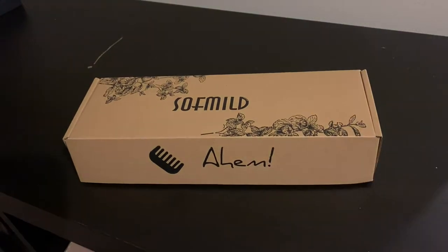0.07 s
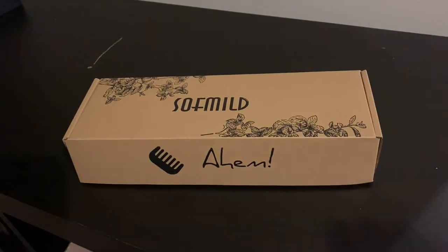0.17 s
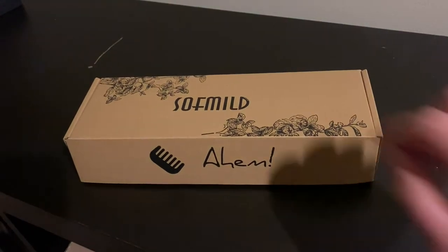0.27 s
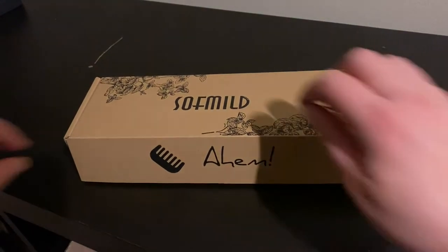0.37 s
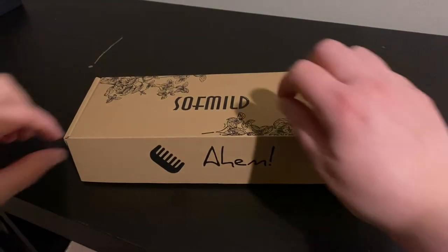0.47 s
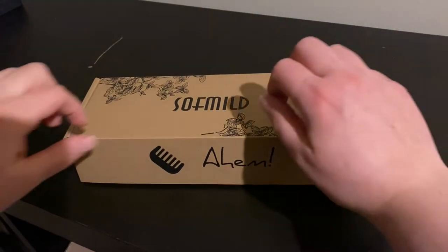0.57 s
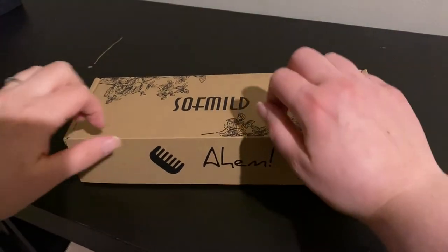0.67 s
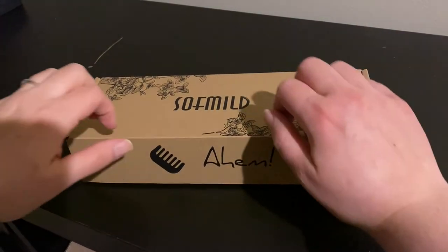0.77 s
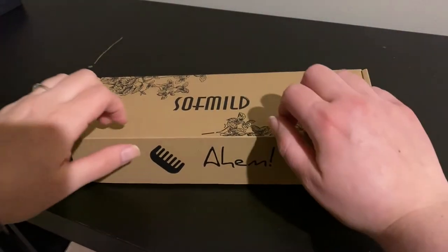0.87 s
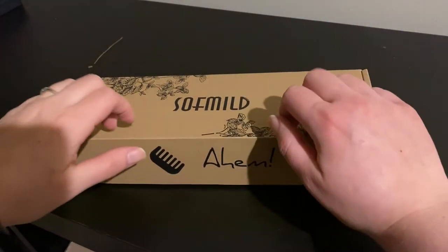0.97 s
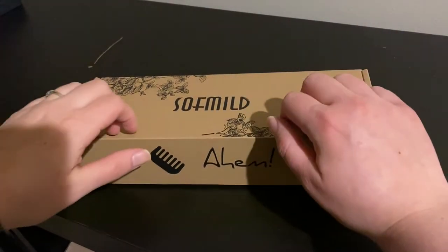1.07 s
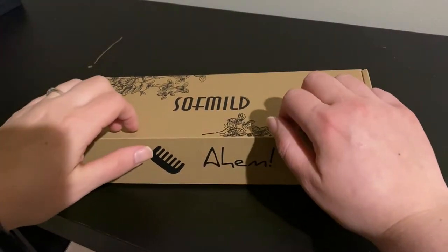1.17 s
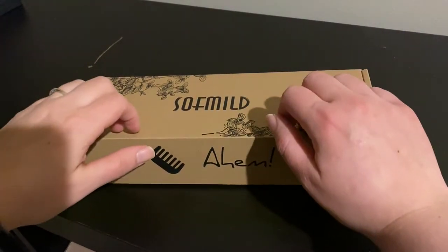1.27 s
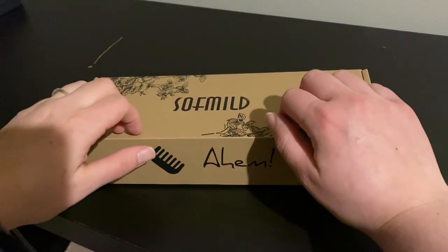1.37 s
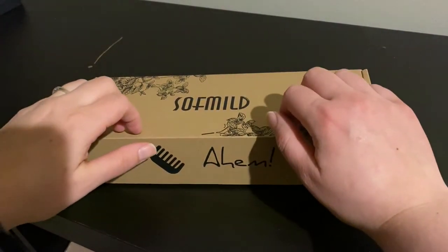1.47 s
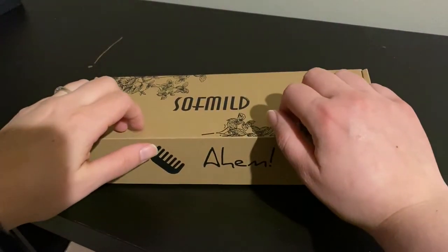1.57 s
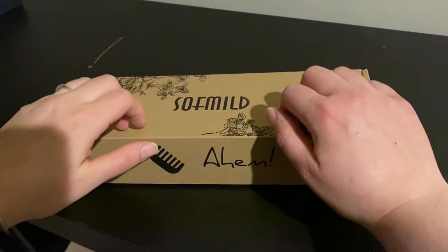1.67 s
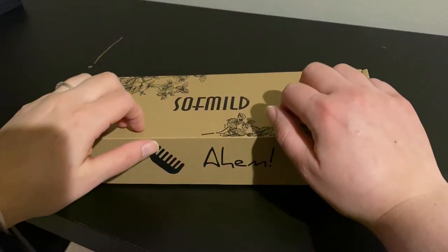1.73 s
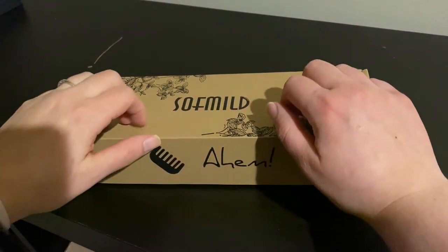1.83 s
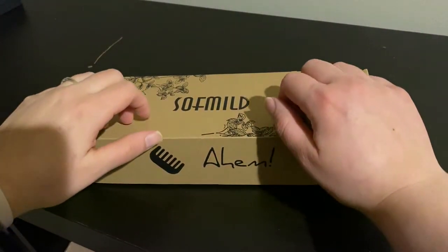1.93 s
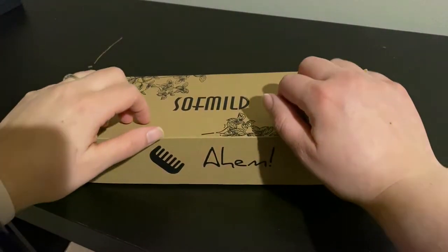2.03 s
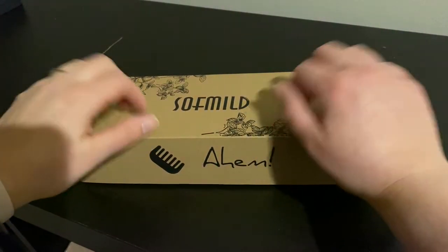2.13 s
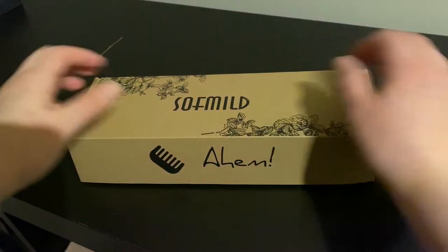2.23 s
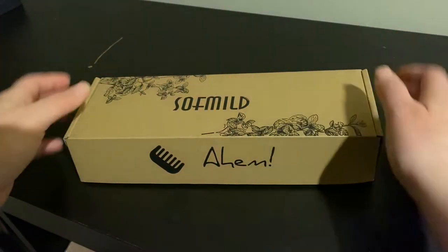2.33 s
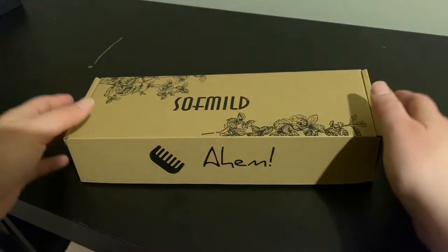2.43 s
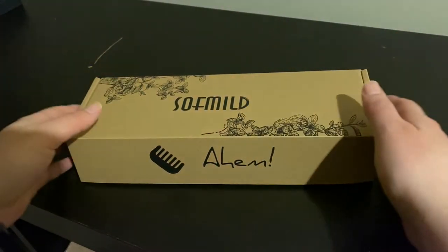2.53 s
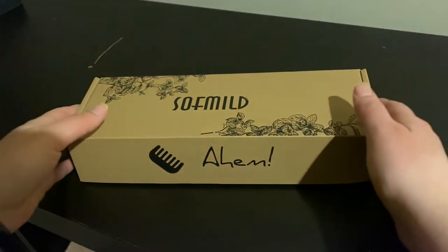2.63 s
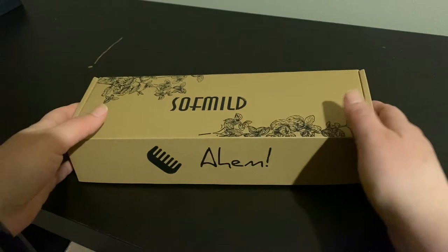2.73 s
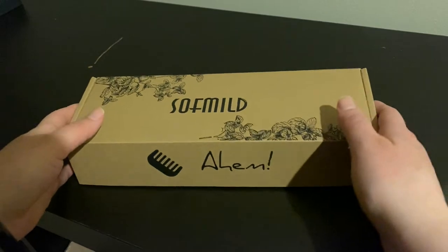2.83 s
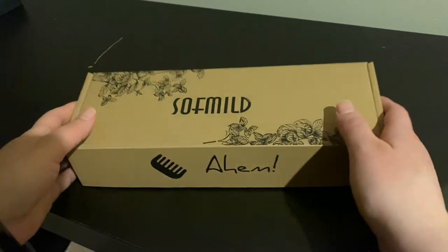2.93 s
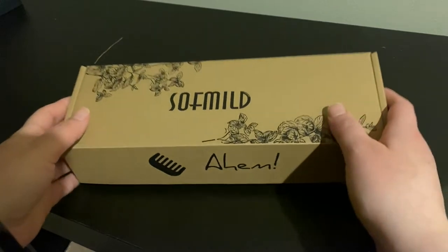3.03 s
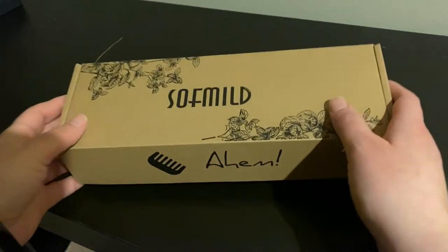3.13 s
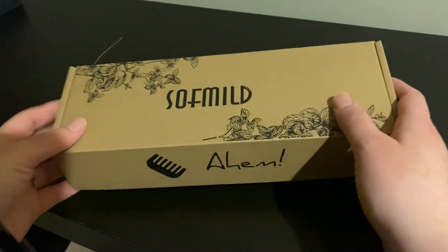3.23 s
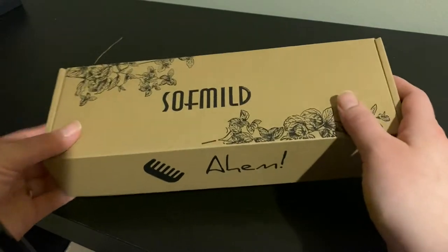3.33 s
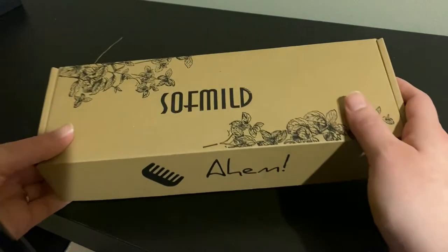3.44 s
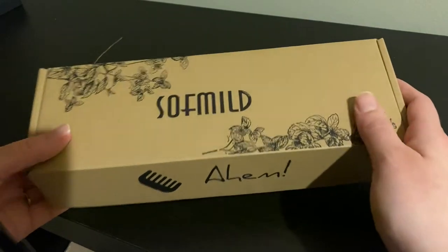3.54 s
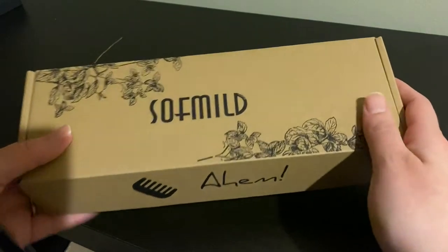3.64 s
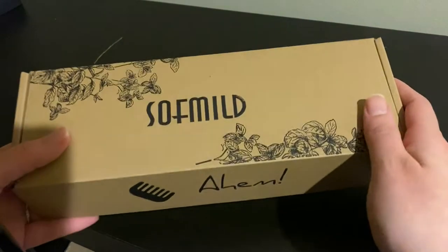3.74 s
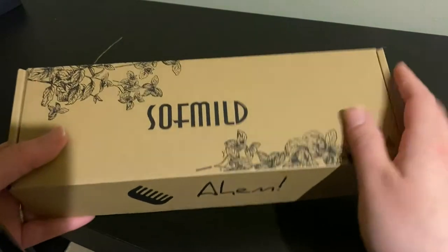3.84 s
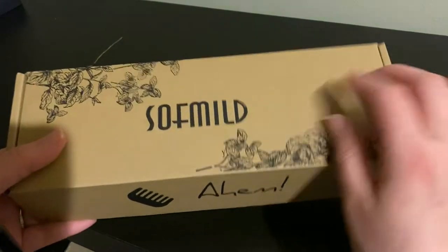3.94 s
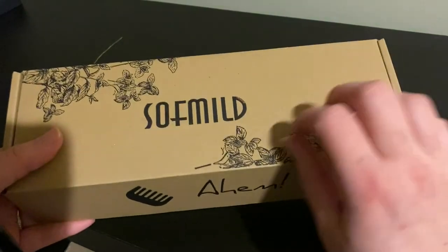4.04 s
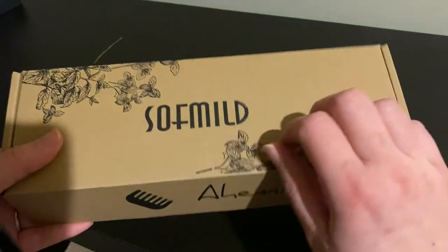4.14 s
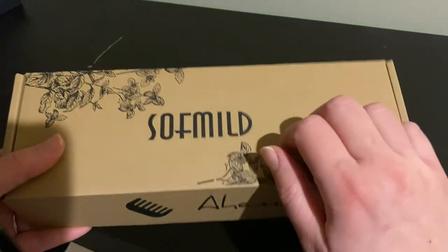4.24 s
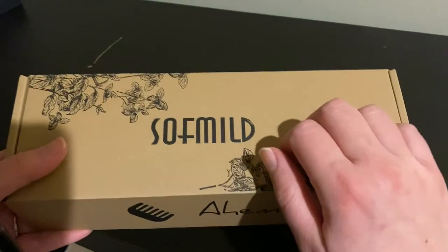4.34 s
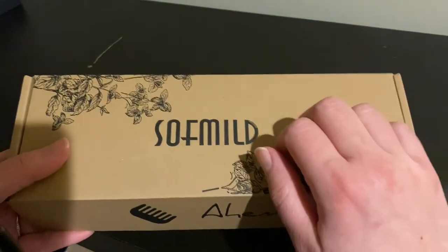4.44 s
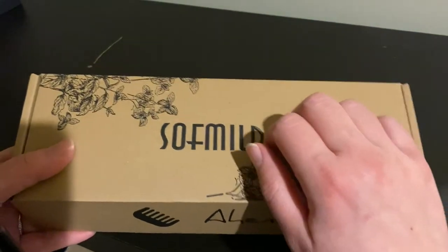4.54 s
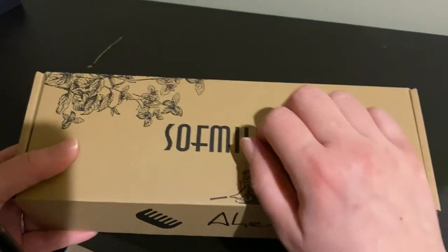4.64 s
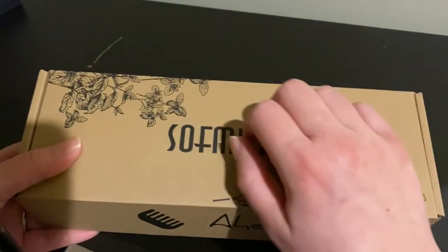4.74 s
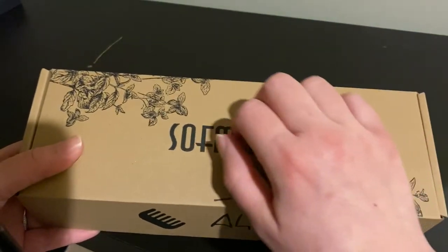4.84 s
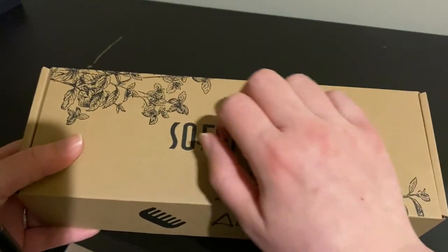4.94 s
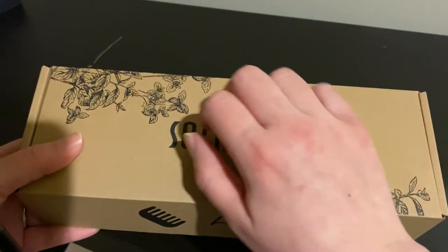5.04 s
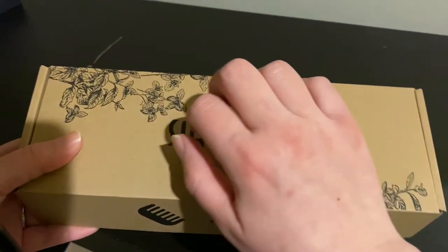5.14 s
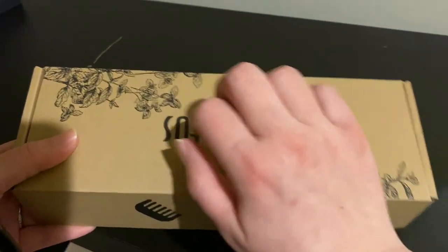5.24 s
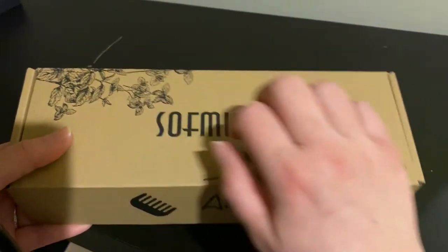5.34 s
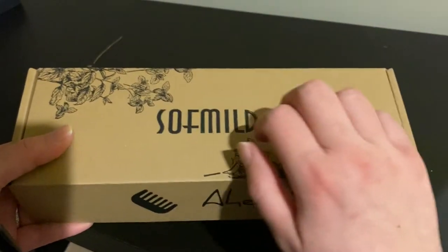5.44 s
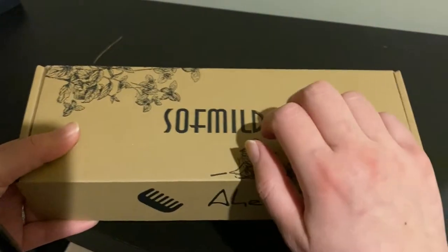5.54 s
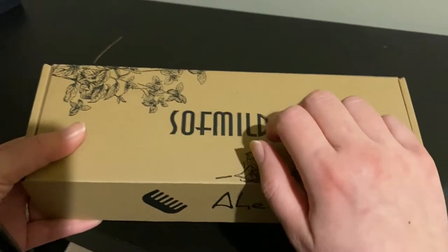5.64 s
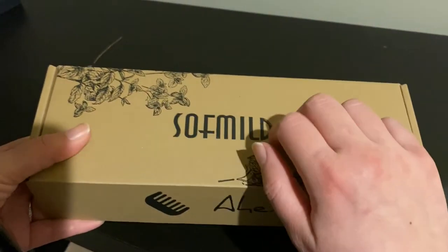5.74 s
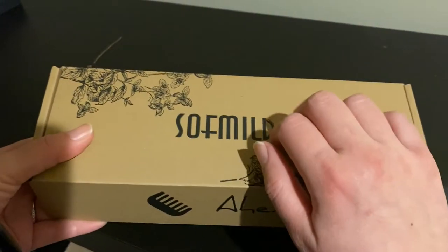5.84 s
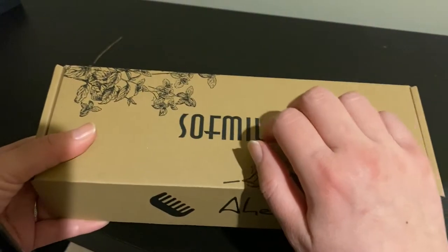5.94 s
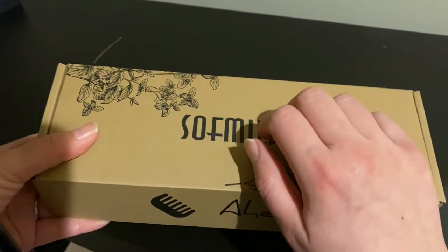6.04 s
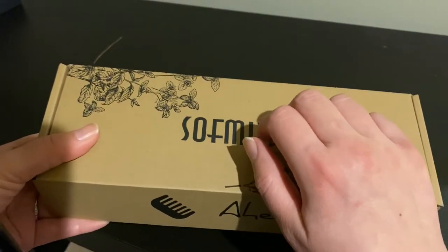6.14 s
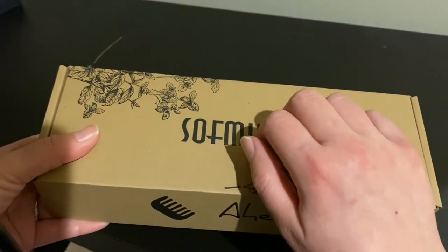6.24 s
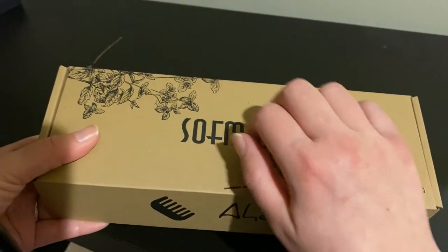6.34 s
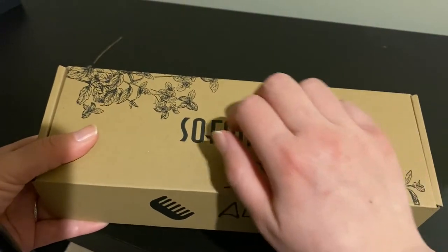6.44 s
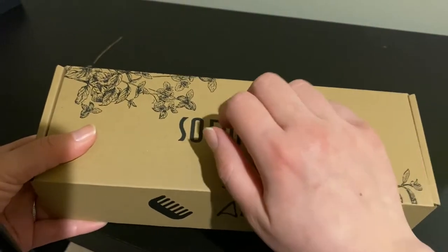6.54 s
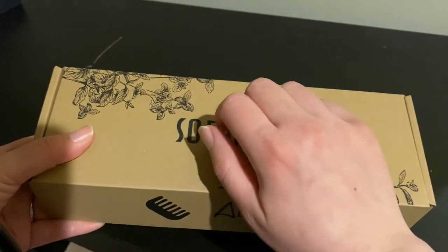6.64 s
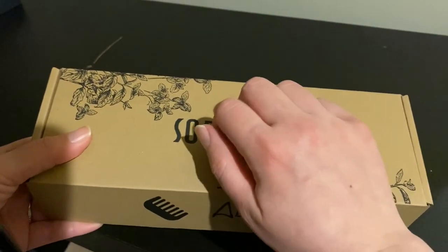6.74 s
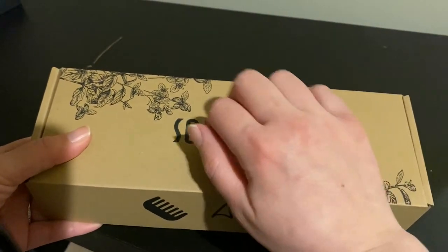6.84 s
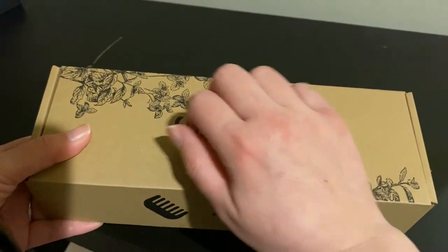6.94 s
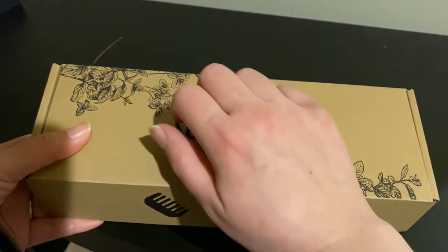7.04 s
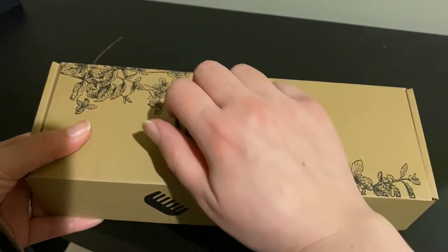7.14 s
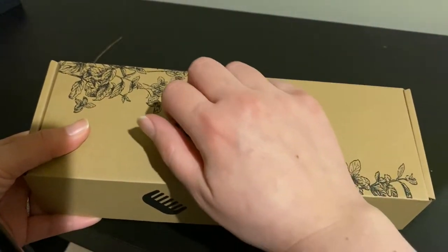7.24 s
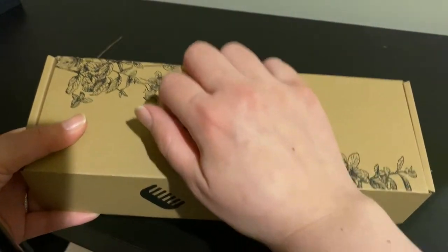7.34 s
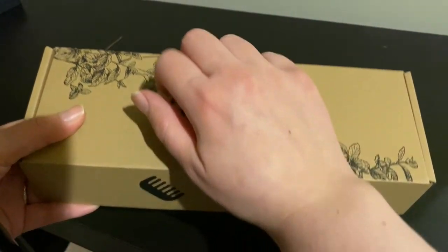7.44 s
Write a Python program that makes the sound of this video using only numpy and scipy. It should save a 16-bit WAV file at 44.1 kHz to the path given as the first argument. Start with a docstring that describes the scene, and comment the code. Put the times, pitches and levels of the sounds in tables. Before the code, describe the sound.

Very close to a stereo microphone in a quiet room, fingernails of two hands drum rapidly on a small corrugated cardboard box. The drumming stops, hands shift and lift the box with soft papery rubbing and skin hiss, then nails tap and scratch the lid in looser bursts with short pauses. Low wavering rumble and faint hiss sit underneath.

```python
"""Fingernails drum on a small corrugated cardboard box close to a two-port microphone in a quiet room.
Hands grip and lift the box, skin hissing on the paper; then one hand taps and drags on the lid.
Nail taps are clicks with dying panel sines, drags are random slips that ring the panels, rasp and
hiss are coloured noise. Short room echoes and a low wavering rumble with faint hiss lie around them."""
import sys
import numpy as np
from scipy import signal
from scipy.fft import rfft, irfft
from scipy.io import wavfile
from scipy.ndimage import uniform_filter1d

SR = 44100
rng = np.random.default_rng(int(sys.argv[2]) if len(sys.argv) > 2 else 0)


def digitize_waveform(pressure):
    """Quantize a signal to 16-bit integers and store it at the path in sys.argv[1].

    Rows of a 2-D input are taken as channels; values are limited to [-1, 1].
    """
    field = np.atleast_2d(pressure).T
    bounded = np.clip(field, -1, 1)
    quanta = np.round(bounded * 32767).astype(np.int16)
    wavfile.write(sys.argv[1], SR, quanta)


N = 330750  # samples, 7.5 s
LIFTED_S = 2.3  # before it two hands drum on the resting box, after it one hand on the held box
TREBLE_PAN_DB = -3.5  # left against right for fine noise, the same wherever the hand is
RING_N = 4096  # samples computed of each click and ring


def amp(db):
    """Turns decibels into an amplitude factor."""
    return 10 ** (np.asarray(db) / 20)


def evened(x):
    """Scales a signal to an RMS of one."""
    return x / np.sqrt(np.mean(x ** 2) + 1e-20)


def read(points, hz):
    """Reads a curve between its points along a logarithmic frequency axis."""
    point_hz, value = np.transpose(points)
    return np.interp(np.log(hz + 1), np.log(point_hz + 1), value)


def colour(x, points):
    """Filters by a spectrum in dB."""
    hz = np.fft.rfftfreq(x.shape[-1], 1 / SR)
    return irfft(rfft(x) * amp(read(points, hz)), x.shape[-1])


def pair(a, b, same):
    """Two channels from two unrelated signals, alike by the share same(Hz)."""
    likeness = np.clip(read(same, np.fft.rfftfreq(N, 1 / SR)), -1, 1)
    right = likeness * rfft(a) + np.sqrt(1 - likeness ** 2) * rfft(b)
    return np.array([a, irfft(right, N)])


def sides(pan_db):
    """Left and right gains that differ by pan_db, positive to the left."""
    return amp(np.multiply.outer([.5, -.5], pan_db))


def smooth_noise(size):
    """Slow random curve: noise averaged twice over size samples, RMS one."""
    once = uniform_filter1d(rng.standard_normal(N), size)
    return evened(uniform_filter1d(once, size))


# spectrum of the quiet room at the microphone: hz, level_db (per Hz)
AIR = [(42, -11.5), (57, 2), (75, 1.5), (100, -11), (125, -2), (155, -9), (185, -6), (350, -13.5),
       (450, -20), (700, -31), (1300, -45), (7000, -53), (14000, -58.5), (15000, -76.5)]
# how alike the room tone is at the two ports: hz, likeness (1 = identical)
AIR_SAME = [(60, 1), (240, 0.74), (930, -0.03), (3630, 0.58), (14300, 0.95)]
# slow level of the rumble, before swells and knocks: time_s, level_db
RUMBLE = [(0, -57), (.7, -61), (1.1, -55), (2.3, -58), (3.5, -56.5), (4.1, -56), (4.6, -57), (5.5, -54),
          (6.6, -53), (7.5, -57)]
# brief swells of the rumble: peak_s, rise_db
SWELLS = [(2.23, 5), (2.44, 7.5), (3.75, 6.5), (4.07, 2.5), (4.26, 3), (4.95, 7), (6.77, 1)]


def room_tone(box):
    """A low rumble wavers and swells as the table passes the knocks on, under a steady faint hiss."""
    swell_s, waver_s, waver_db = 0.031, 0.05, 1.5
    shake_s, shake_db = 0.017, 34  # how the rumble follows the box's own level
    air_db = -63.5  # room tone above the rumble
    noise = pair(*colour(rng.standard_normal((2, N)), AIR), AIR_SAME)
    low = colour(noise, [(160, -2), (260, -36)])
    t = np.arange(N) / SR
    level_db = np.interp(t, *np.transpose(RUMBLE)) + waver_db * smooth_noise(int(waver_s * SR))
    for peak_s, rise_db in SWELLS:
        level_db += rise_db * np.exp(-((t - peak_s) / swell_s) ** 2)
    box_power = abs(uniform_filter1d((box ** 2).mean(0), int(shake_s * SR)))
    shake = np.sqrt(1 + amp(shake_db) ** 2 * box_power)
    return amp(level_db) * shake * evened(low) + amp(air_db) * evened(noise - low)


# panels of the box: pitch_hz, level_db, t60_s (before a finger damps them)
BOX = [(214.6, 5.5, 0.042), (264, 3, 0.058), (340.6, -2, 0.036), (408, -1, 0.028), (460.3, -4, 0.06),
       (516, -5, 0.043), (569.4, -3, 0.054), (637, -2.5, 0.044), (705, -4, 0.019), (842, 1, 0.029),
       (947, 1, 0.042), (1030, -1, 0.04), (1119, -3, 0.055), (1233, 2.5, 0.022), (1402, -4, 0.034),
       (1552, -5, 0.031), (1721, -3, 0.035), (1889, -1, 0.019), (2159, -3.5, 0.019), (2424, -13.5, 0.027),
       (2698, -6, 0.026)]
PANEL_HZ = np.transpose(BOX)[0]
PANEL_SIGN = (-1) ** (np.arange(len(PANEL_HZ)) // 2)  # used by taps: modes push against their neighbours


def rings(t):
    """One dying sine for each panel mode."""
    hz, db, t60 = np.transpose(BOX)[:, :, None]
    return amp(db - 60 * t / t60) * np.sin(2 * np.pi * hz * t)


def slips(per_s, spread_db):
    """Fibres that catch and let go: clicks of random sign, a few large."""
    size = amp(spread_db * np.minimum(rng.exponential(1, (2, N)), 5))
    let_go = rng.random((2, N)) < per_s / SR
    return size * let_go * rng.choice([-1, 1], (2, N))


def drag(centre_hz, lift_db, low_db, high_db, per_s):
    """Coarse slips ring the panels, most those near centre_hz."""
    share_db = lift_db * np.exp(-(np.log(PANEL_HZ / centre_hz) / 0.6) ** 2)
    share_db += low_db * (PANEL_HZ < 320) + high_db * (PANEL_HZ > 800)
    signs = (-1) ** np.arange(len(PANEL_HZ))
    panels = amp(share_db) * signs @ rings(np.arange(RING_N) / SR)
    return evened(signal.oaconvolve(slips(per_s, 3.0), panels[None])[:, :N])


def mottled(x, depth_db, size):
    """The colour shifts as the contact moves: random patches some hundred Hz wide, size frames long."""
    z = signal.stft(x, nperseg=256, noverlap=192)[2]
    patches = uniform_filter1d(rng.standard_normal(z.shape[1:]), size=2, axis=0)
    patches = evened(uniform_filter1d(patches, size=size, axis=1))
    return evened(signal.istft(z * amp(depth_db * patches), nperseg=256, noverlap=192)[1][:, :N])


# hands and sleeves brushing the box: loudest_s, rise_s, fall_s,
# drag_db (on the panels), grit_db, hiss_db (skin and cloth)
RUB = [(.03, .08, 0.076, -70, -76, -80.5), (0.298, 0.33, 0.79, -71, -73, -78.5),
       (2.44, 0.16, 0.45, -77, -83, -74.5), (2.535, .03, 0.072, -61, -78, -77),
       (2.639, 0.077, 0.076, -45.5, -51.5, -62), (2.801, 0.14, 0.092, -53.5, -70, -74),
       (2.88, 0.1, 0.2, -68, -64, -63.5), (3.1, 0.17, 0.089, -61.5, -69, -75.5),
       (3.212, .05, 0.059, -61, -60, -52.5), (3.326, 0.063, 0.06, -57.5, -57, -58),
       (3.502, .13, 0.063, -52.5, -49, -47.5), (3.599, 0.13, 0.068, -50.5, -56.5, -48),
       (3.772, 0.095, 0.069, -37, -47, -51.5), (3.898, 0.069, 0.11, -62, -63, -51.5),
       (4.78, .06, 0.12, -69, -86, -92)]


def brushes():
    """Hands swell and fade on the box: levels of panel drag, grit and hiss over time."""
    edge_db, flatness = -25, 1.92  # level at start and end; higher flatness stays longer near the loudest
    t, level = np.arange(N) / SR, np.zeros((3, N))
    for loudest_s, rise_s, fall_s, *levels_db in RUB:
        away = np.where(t < loudest_s, (loudest_s - t) / rise_s, (t - loudest_s) / fall_s)
        near = away < 2
        level[:, near] += amp(np.add.outer(levels_db, edge_db * away[near] ** flatness))
    return level


# nails scratching on the lid, some of them close to a tap: start_s, length_s,
# rise_share (of the length), drag_db (on the panels), grit_db
SCRATCHES = [(1.077, 0.041, 0.32, -51.5, -61), (1.175, 0.048, 0.46, -56, -67),
             (1.304, 0.025, .47, -42, -63), (1.417, 0.036, 0.49, -44, -60), (1.59, 0.064, 0.77, -52, -58.5),
             (1.908, 0.1, 0.42, -55, -65), (2.013, 0.086, 0.51, -45.5, -64),
             (4.114, 0.073, 0.41, -51, -61.5), (4.17, 0.095, 0.17, -43.5, -61.5),
             (4.25, 0.061, .1, -46, -66.5), (4.322, 0.059, .85, -43, -63.5),
             (4.385, 0.13, 0.26, -43, -58.5), (4.521, 0.11, 0.19, -36.5, -56.5),
             (4.586, 0.042, 0.66, -37.5, -52), (4.624, 0.084, 0.12, -39.5, -48.5),
             (4.697, 0.057, 0.24, -48, -60), (4.729, 0.022, 0.54, -40, -79),
             (5.491, 0.057, 0.17, -55.5, -60), (5.67, 0.093, .4, -56, -74),
             (5.928, 0.14, 0.062, -42.5, -68), (6.122, 0.099, 0.43, -54, -87),
             (6.204, 0.07, 0.22, -50, -70), (6.709, 0.034, 0.57, -44, -51), (7.218, 0.03, 0.68, -37.5, -50),
             (7.248, 0.05, .1, -74, -66), (7.392, 0.033, 0.63, -81, -76), (7.437, .067, .33, -64, -77)]


def strokes():
    """Pressure of the sliding nails over time, on the panels and on the fibres."""
    slide_s, slide_rise = 0.069, 0.05  # the nail slides on after a tap: length, share spent rising
    slides = []
    for start_s, level_db, *_, slide_db in TAPS:
        grit_db = level_db + slide_db
        drag_over_grit_db = TOUCH[start_s > LIFTED_S][-1]
        slides.append((start_s, slide_s, slide_rise, grit_db + drag_over_grit_db, grit_db))
    t, out = np.arange(N) / SR, np.zeros((2, N))
    for start_s, length_s, rise_share, drag_db, grit_db in slides + list(SCRATCHES):
        corners_s = start_s + length_s * np.array([0, rise_share, .92, 1.1])
        out += amp([[drag_db], [grit_db]]) * np.interp(t, corners_s, [0, 0.97, 0.16, 0.0009])
    return out


# nail and skin on paper fibres: hz, level_db (per Hz)
GRIT = [(500, -8.5), (1000, -2), (1500, 0), (2100, -5), (2900, -10), (4200, -12), (5000, -15), (7000, -22),
        (11000, -26.5), (16000, -31)]
# skin and cloth on paper: hz, level_db (per Hz)
HISS = [(1500, -11), (3000, -0.5), (5000, 1), (8000, 0), (12000, -1), (16000, -4)]
# how alike the rubbing is at the two ports: hz, likeness (1 = identical)
RUB_SAME = [(300, 0.88), (1200, 0.32), (3500, 0.8), (5500, 0.64), (7500, 0.09), (8400, 1), (9700, 1),
            (10500, 0.077), (12000, .99), (13700, .7), (14500, 1)]


def rubbing():
    """Panels hum under the drag, fibres rasp in clumps, and skin hisses smoothly."""
    hand_drag, hand_grit, hand_hiss = brushes()
    nail_drag, nail_grit = strokes()
    # the flutes under the paper make the grip uneven
    clumps = amp(2.1 * evened(uniform_filter1d(rng.standard_normal(N), 250)))
    grit = mottled(colour(clumps * slips(5000, 1.9), GRIT), depth_db=3.5, size=25)
    hiss = mottled(colour(rng.standard_normal((2, N)), HISS), depth_db=1.9, size=35)
    # hands work the sides of the box, nails its lid
    hum = hand_drag * drag(centre_hz=400, lift_db=5.7, low_db=-11, high_db=-13.0, per_s=250)
    hum += nail_drag * drag(centre_hz=558, lift_db=15.5, low_db=-9.0, high_db=-6.5, per_s=350)
    fine = (hand_grit + nail_grit) * grit + hand_hiss * hiss
    # two hands drum, later only the right one
    pan_db = np.where(np.arange(N) / SR < LIFTED_S, -1.2, -3.5)
    return pair(*hum, RUB_SAME) * sides(pan_db) + pair(*fine, RUB_SAME) * sides(TREBLE_PAN_DB)[:, None]


# nail edge striking the lid: hz, level_db
CLICK = [(1200, -47), (2200, 2), (3500, 5), (6000, -4.5), (9000, -13), (13000, -18.5), (16000, -50)]
# first touch of the nail tip: hz, level_db
TICK = [(3000, -30), (6000, -2), (10000, -1), (16000, -2.5)]
# how a tap sounds, one row for the resting box and one for the held box: click_db (against the ring),
# damping_per_s (by the finger), pan_db (left against right), drag_db (of the slide above its grit)
TOUCH = [(-21, 40, -2, 10.5), (-20, 76, -3.5, 8)]
# nail taps: start_s, level_db (peak), pitch_hz (loudest ring), thump_db (lowest panels),
# knock_db (highest panels), slide_db (grit after the tap, against the tap)
TAPS = [(0.815, -29, 616, -44, -11.5, -33), (0.874, -22, 613, -4.5, -14, -31),
        (0.967, -16, 663, -6.5, -16, -36.5), (1.001, -19, 450, -9.5, -16, -48),
        (1.026, -21.5, 537, -4, -29, -41.5), (1.094, -32.5, 602, -44, -11, -39),
        (1.129, -42, 301, -22, -20, -37.5), (1.237, -22.5, 630, -11.5, -16, -38),
        (1.271, -28, 337, -21, -18, -40), (1.29, -24.5, 660, -8, -24, -40.5),
        (1.333, -19.5, 607, -6, -22, -40), (1.433, -33.5, 579, -19, -18, -30),
        (1.466, -25, 627, -4, -12.5, -40), (1.531, -33, 656, -41, -13, -40.5),
        (1.622, -20, 483, -6.5, -17, -44), (1.675, -13, 617, -9.5, -18, -44.5),
        (1.76, -26.5, 615, -28, -12.5, -34.5), (1.79, -24, 645, -0.5, -9, -46),
        (1.838, -15, 589, -11, -20, -42), (1.878, -24, 630, -24, -14.5, -42),
        (1.971, -17, 540, -3, -15.5, -37), (1.997, -16.5, 435, -15, -17, -45.5),
        (2.762, -47.5, 640, -25, -8, -39.5), (3.099, -56, 503, -22, -10, -28),
        (3.321, -38, 514, -7, -23, -40), (4.094, -19.5, 651, -40, -15, -33.5),
        (4.246, -22.5, 640, -32, -12, -40.5), (4.278, -23.5, 485, -10.5, -18.5, -47),
        (4.394, -31, 696, -28, -8, -37), (4.422, -24, 710, -25, -11.5, -32.5),
        (4.53, -30.5, 467, -11, -10.5, -23.5), (4.549, -20, 546, -40, -11, -38.5),
        (5.446, -18, 637, -20, -12.5, -42.5), (5.54, -15, 655, -32, -12, -44.5),
        (5.621, -23, 551, -17, -10.5, -43), (5.737, -17.5, 533, -16, -10.5, -40),
        (5.934, -16.5, 630, -37, -12, -43), (5.972, -32.5, 530, -33, -12, -43),
        (6.052, -21, 593, -13.5, -8, -44), (6.188, -20.5, 546, -26, -14, -45.5),
        (6.478, -22.5, 543, -29, -14, -39), (6.546, -29, 680, -8.5, -17, -41),
        (6.575, -24.5, 536, -13, -10, -46), (6.623, -26.5, 427, -14, -8.5, -43),
        (6.751, -18.5, 529, -13, -14.5, -43.5), (6.976, -21.5, 533, -20, -9.5, -40),
        (7.012, -19, 583, -28, -10, -40.5), (7.105, -20, 542, -12, -9, -42),
        (7.42, -16.5, 537, -23, -15, -37.5), (7.426, -20.5, 582, -26, -5.5, -54)]


def taps():
    """A nail clicks, then presses for a moment; the spot struck picks which panels ring."""
    tick_db, tick_s = -13, 0.00089  # level against the click, decay time
    out, t = np.zeros((2, N + RING_N)), np.arange(RING_N) / SR
    modes = rings(t)
    swell = 1 - .85 * np.exp(-t / .0012)  # the lid takes a moment to get moving
    click_shape = (1 - np.exp(-t / 0.00012)) * (np.exp(-t / 0.0024) + 0.4 * np.exp(-t / 0.0028))
    for start_s, level_db, pitch_hz, thump_db, knock_db, _ in TAPS:
        click_db, damping_per_s, pan_db, _ = TOUCH[start_s > LIFTED_S]
        spot = (2 * rng.random((3, len(PANEL_HZ))) - 1) * np.sqrt(3)
        panel_db = 10.9 * np.exp(-(np.log(PANEL_HZ / pitch_hz) / 0.063) ** 2)
        panel_db += (2.0 + 2.0 * (PANEL_HZ > 800)) * spot[0]
        panel_db += thump_db * (PANEL_HZ < 320) + knock_db * (PANEL_HZ > 800)
        blend = amp(panel_db + 4.4 * spot[1:]) * PANEL_SIGN  # each port hears its own blend
        body = blend @ modes * swell * np.exp(-damping_per_s * t)
        body *= sides(pan_db)[:, None] / abs(body).max()
        click = colour(rng.standard_normal(RING_N), CLICK) * click_shape
        click = click * sides(TREBLE_PAN_DB)[:, None] / abs(click).max()
        tip = colour(rng.standard_normal((2, RING_N)), TICK) * np.exp(-t / tick_s)  # one for each port
        click += amp(tick_db) * tip / abs(tip).max()
        at = round(start_s * SR)
        out[:, at:at + RING_N] += amp(level_db) * (body + amp(click_db) * click)
    no_bass = signal.butter(2, 170, "high", fs=SR, output="sos")  # a small box radiates no bass
    return signal.sosfilt(no_bass, out[:, :N])


# how long the room's echoes last: hz, t60_s
ROOM = [(150, 0.72), (600, 0.19), (2000, 0.38), (8000, .18)]


def room(x):
    """Sparse echoes of random sign, each band dying at its own speed."""
    echoes = np.zeros((2, SR // 2))
    at = np.arange(300, SR // 2 - 20, 20) + rng.integers(0, 20, (2, (SR // 2 - 301) // 20))
    np.put_along_axis(echoes, at, rng.choice([-1., 1.], at.shape), 1)
    hz, t, z = signal.stft(echoes, SR, nperseg=256)
    decay = amp(-60 * t / read(ROOM, hz)[:, None])
    tail = signal.istft(z * decay, SR, nperseg=256)[1]
    tail[1] = 0.24 * tail[0] + 0.61 * tail[1]  # the ports are close together
    return signal.fftconvolve(x, tail / np.linalg.norm(tail[0]), axes=1)[:, :N]


def scene():
    """The box close to the microphone, its echoes in the room, and the room tone."""
    box = taps() + rubbing()
    return box + amp(-15.5) * room(box) + room_tone(box)


# level of the left channel against the right: hz, level_db
LEFT = [(150, 0), (600, 0.5), (5000, -0.5), (7000, 2.5)]
# phase between the two channels: hz, lead_rad (left leads)
LEAD = [(100, 0), (345, -.45), (690, -.65), (1700, -.1), (3500, -.15), (5500, -.55), (6500, 0), (7600, 1.9),
        (8300, 3.14), (9800, 3.14), (10900, 5.4), (11700, 6.28), (13200, 6.5), (14400, 9.42), (16000, 9.42)]


def record(dry):
    """Phase and level between the two channels change with frequency; rumble filter, then band limit."""
    hz = np.fft.rfftfreq(N, 1 / SR)
    left = amp(read(LEFT, hz)) * np.exp(1j * read(LEAD, hz))
    channels = np.array([irfft(rfft(dry[0]) * left, N), dry[1]])
    channels = signal.sosfilt(signal.butter(4, 45, "high", fs=SR, output="sos"), channels)
    band_limit = signal.firwin(511, 15300, window=("kaiser", 9), fs=SR)
    return signal.oaconvolve(channels, band_limit[None], "same")


dry = scene()
out = record(dry)
digitize_waveform(out)
```